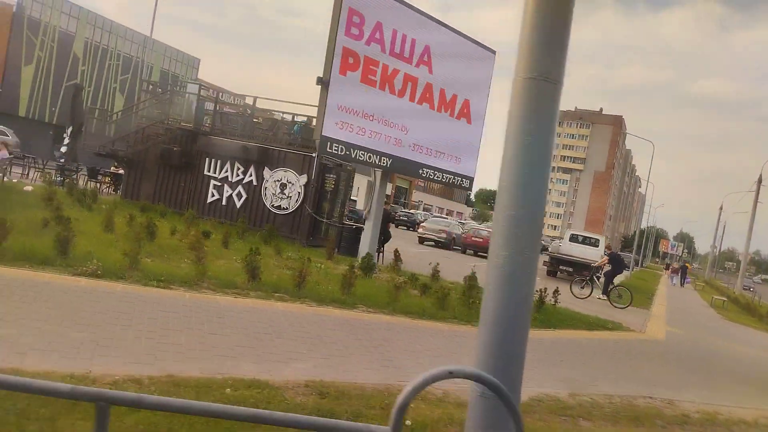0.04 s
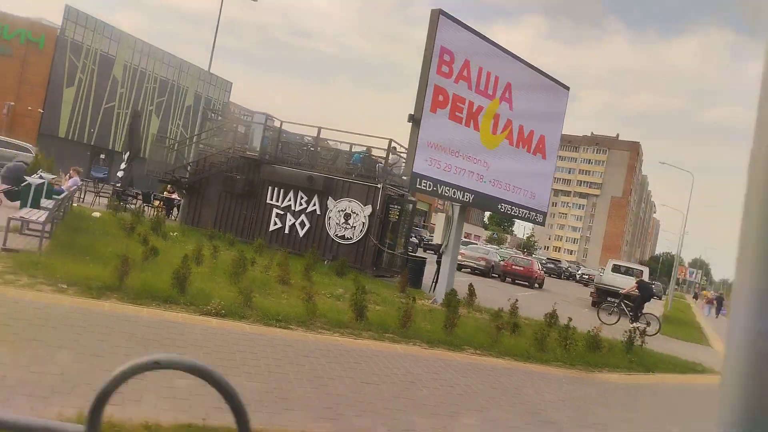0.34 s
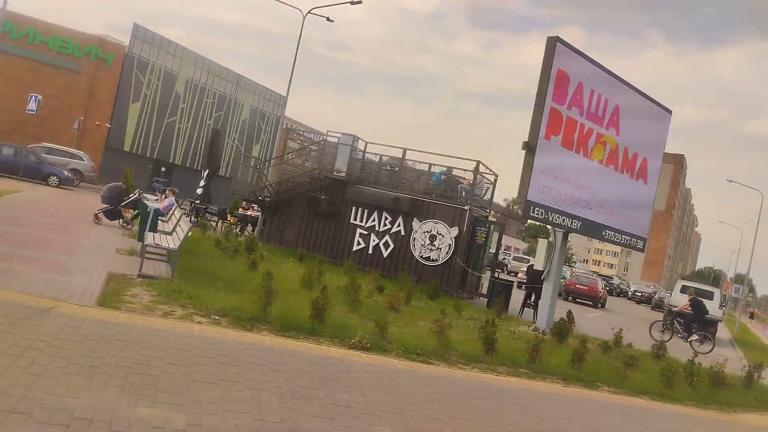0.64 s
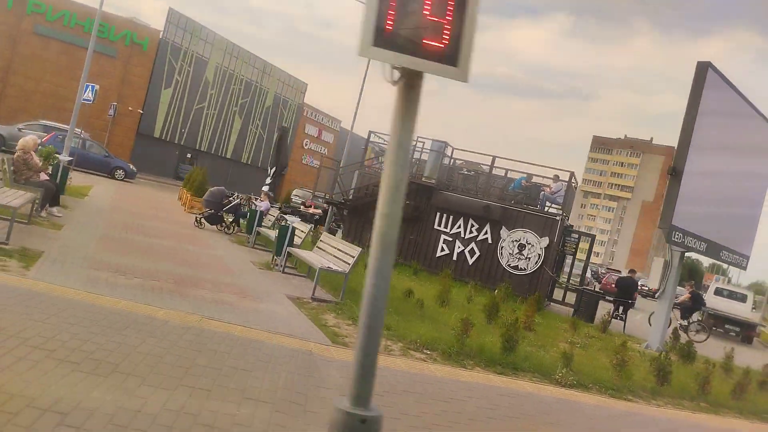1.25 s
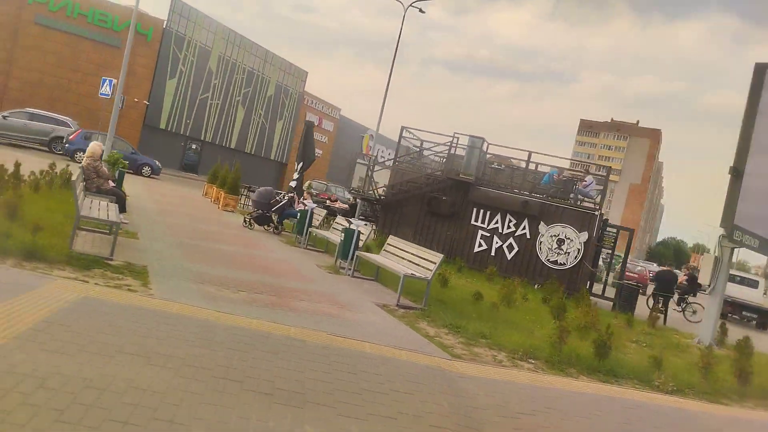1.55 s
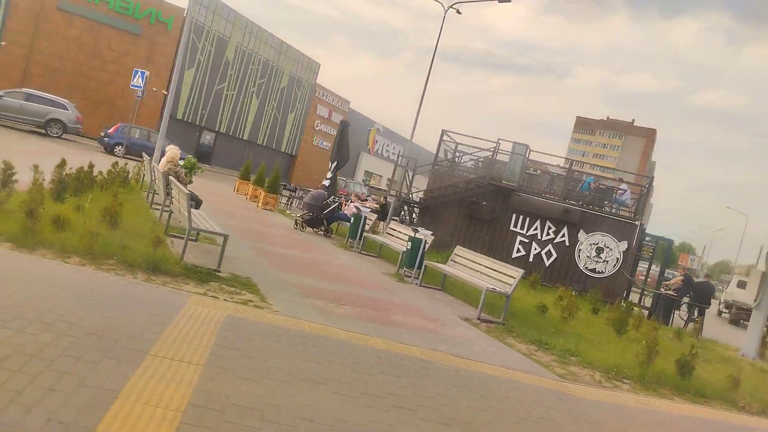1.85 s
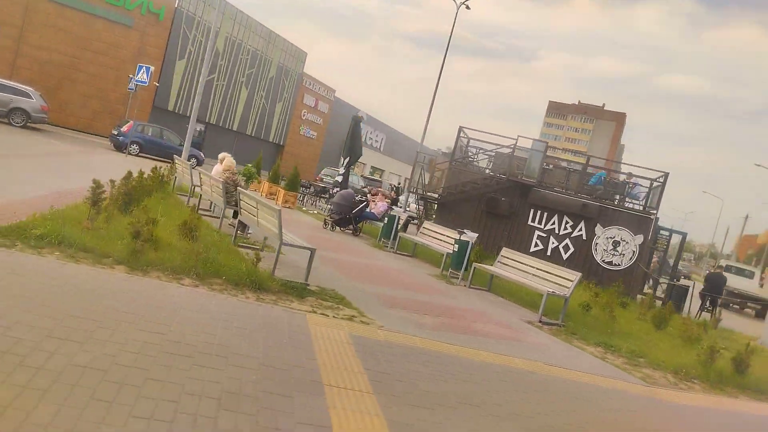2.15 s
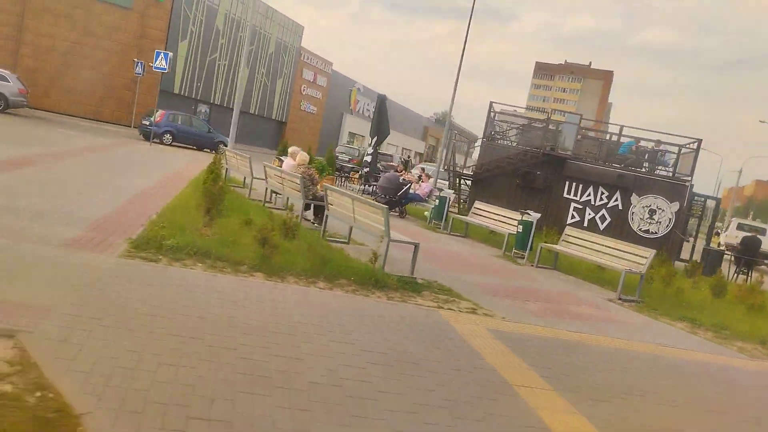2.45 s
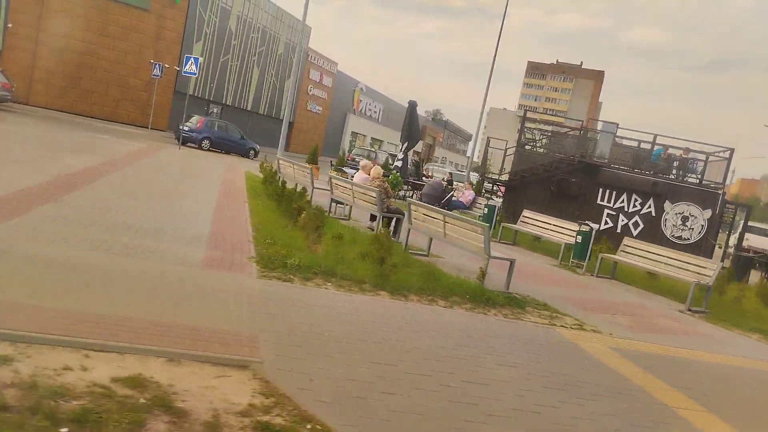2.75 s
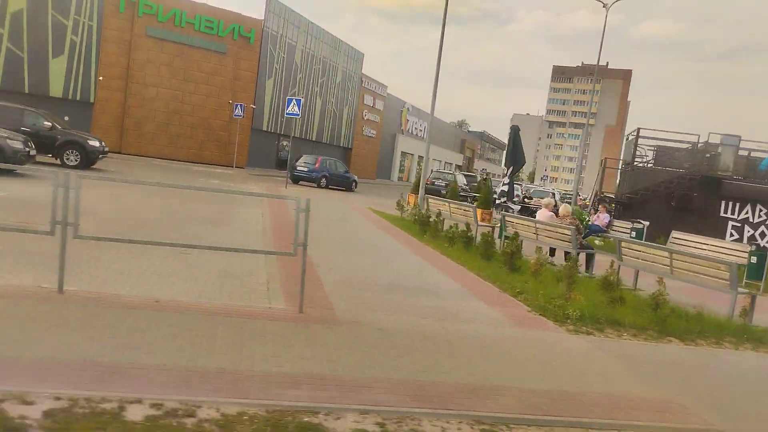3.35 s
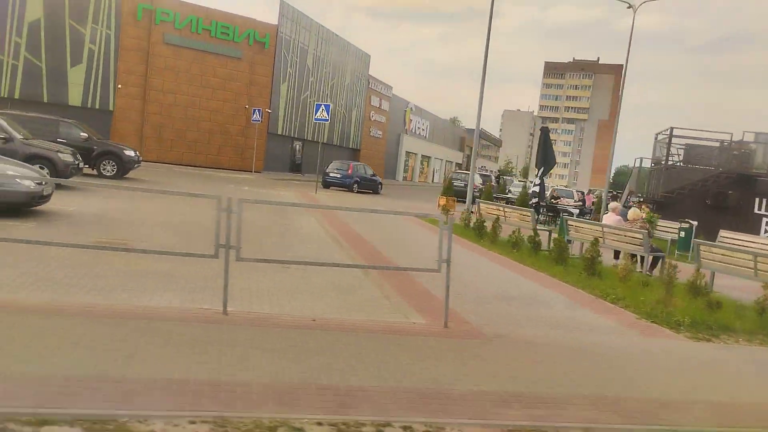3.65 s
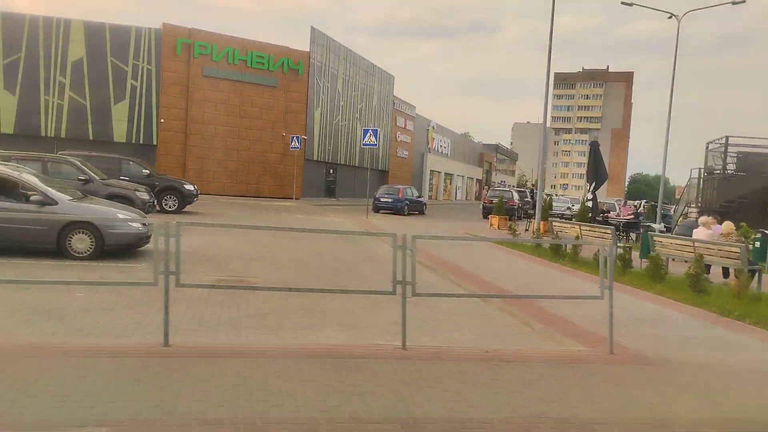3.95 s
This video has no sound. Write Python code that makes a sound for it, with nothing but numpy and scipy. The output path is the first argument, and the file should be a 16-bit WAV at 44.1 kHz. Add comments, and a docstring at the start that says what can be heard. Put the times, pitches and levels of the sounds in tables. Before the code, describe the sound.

A moving city bus rumbles and hums throughout, heard on a phone at a window seat, its engine note sinking as it eases off. From about 1 second a loose metal fitting chatters in thin bursts. Around 2.4 seconds a faint whistle starts to fall. From 3.2 seconds bumps bring low thuds, dull panel knocks and brief trim squeaks, until about 4 seconds.

```python
"""A moving city bus, heard on a phone microphone at a window seat. From the start tyres rumble underfoot,
the driveline's hum creeps up with road speed and the engine's firing note sinks as the throttle eases.
After a second a loose metal fitting chatters in bursts. From 2.4 s a faint turbo whistle runs down, and
the hum soon sags. From 3.2 s bumps heave the body on its springs, a panel knocks and the trim squeaks."""
import sys
import numpy as np
from scipy import signal
from scipy.fft import rfft, irfft
from scipy.io import wavfile
from scipy.ndimage import uniform_filter1d

SR = 44100
rng = np.random.default_rng(int(sys.argv[2]) if len(sys.argv) > 2 else 0)


def generate_wav(signal):
    """Clip the signal to [-1, 1] and save it as 16-bit WAV at the path in sys.argv[1]."""
    frames = np.transpose(np.atleast_2d(signal))
    scaled = np.clip(frames, -1, 1) * 32767
    pcm = np.round(scaled).astype(np.int16)
    wavfile.write(sys.argv[1], SR, pcm)


N = 176400

# the hum's fundamental (time [s], pitch [Hz])
DRIVELINE_PITCH = [(0, 146.9), (.5, 149.9), (1, 152.7), (1.5, 156.1), (2, 156.8), (2.6, 157.8),
                   (3.1, 156.2), (3.6, 153.9), (4, 152.5)]
# its first four harmonics at the seat, each (time [s], level [dB])
HARMONIC_1 = [(0, -11), (.7, -15.5), (.85, -16), (1.2, -14.5), (1.5, -17.5), (1.75, -11.5), (2.4, -14),
              (2.85, -21), (3.05, -32), (3.4, -21.5), (4, -40)]
HARMONIC_2 = [(0, -24), (.3, -45), (.47, -26.5), (.9, -18.5), (1.15, -26.5), (1.6, -23.5), (2.6, -26),
              (3.1, -27.5), (3.4, -37.5), (4, -39)]
HARMONIC_3 = [(0, -26.5), (.62, -23.5), (.8, -37.5), (2.1, -30), (2.4, -36.5), (2.65, -28.5), (3.05, -28),
              (3.3, -38), (4, -46)]
HARMONIC_4 = [(0, -31.5), (.6, -36.5), (.9, -29.5), (1.9, -39), (2.6, -33.5), (3, -40.5), (3.65, -36),
              (3.77, -27.5), (4, -26.5)]

def driveline(fifth_db=-51.5, flutter_db=1.17, overtone_flutter_db=2.5, wow=.003):
    """A hum tied to road speed fills the cabin; its harmonics waver and fade at the microphone."""
    pitch = curve(DRIVELINE_PITCH) * (1 + wow * walk(25.09))
    phase = 2 * np.pi * np.cumsum(pitch) / SR
    levels = [curve(HARMONIC_1), curve(HARMONIC_2), curve(HARMONIC_3), curve(HARMONIC_4), fifth_db]
    hum = 0
    for harmonic, db in enumerate(levels, start=1):
        flutter = (flutter_db if harmonic == 1 else overtone_flutter_db) * walk(27.96)
        hum += undb(db + flutter) * np.sin(harmonic * phase + 2 * np.pi * rng.random())
    return np.sqrt(2) * hum


# the engine easing off (time [s], firing rate [Hz], level [dB])
FIRING = [(0, 62, -13.5), (.5, 61.8, -16), (.8, 60.2, -17.5), (1.12, 58, -21.5), (1.4, 56.85, -19.5),
          (2.2, 56, -20), (2.6, 53.5, -22.5), (2.9, 51.8, -22.5), (3.2, 44.86, -25.5), (3.5, 39, -34),
          (4, 31, -22)]
# its orders (multiple of the firing rate, relative level [dB])
ENGINE_ORDERS = [(.5, -33), (1, 0.5), (1.5, -20), (2, -3), (3, -14.5), (3.5, -7.5), (4, -11.5), (4.5, -14)]

def engine(rough_db=1, jitter=.0036):
    """Uneven firings reach the seat through the body, booming at low orders of the firing rate."""
    firing_hz = curve(FIRING) * (1 + jitter * walk(15))
    phase = 2 * np.pi * np.cumsum(firing_hz) / SR
    boom = 0
    for order, db in ENGINE_ORDERS:
        boom += undb(db - rough_db * walk(14)) * np.sin(order * phase + 2 * np.pi * rng.random())
    return np.sqrt(2) * boom * undb(curve(FIRING, axis=2))


# road noise inside the bus (frequency [Hz], relative density [dB])
ROAD_SPECTRUM = [(8, -7.5), (18, 6.5), (30, 2), (70, -5.5), (120, -3.5), (170, -6.5), (220, -5),
                 (280, -12.5), (440, -13), (560, -17.5), (650, -19.5), (820, -22.5), (1150, -22.5),
                 (1450, -28), (1750, -30), (2500, -36), (3100, -44.5), (5000, -46.5), (8000, -51.5),
                 (10500, -60), (13000, -70), (16000, -72)]
# its changing balance (time [s], bass gain [dB], middle gain [dB], treble gain [dB])
ROAD_BALANCE = [(0, 0, 3, 2.5), (.8, 1.5, 1, -0.5), (1.3, 2.5, 0.5, -2), (2.2, 1, 1, -1.5),
                (2.9, 0, -1.5, -1.5), (3.3, 1, -2, -4.5), (3.6, 1, -3.5, -4.5), (4, -4, -5.5, -6.5)]
# trim resonances (centre [Hz], half-width [Hz], level before the treble gain [dB])
TRIM_RESONANCES = [(973, 41, -47.5), (1252, 23, -53), (1660, 99, -43.5), (4880, 130, -72)]

def road(gain_db=-16.5, swell_db=.42, flicker_db=.77):
    """Tyres rumble through the floor below the microphone, and the shaken trim rings."""
    hz = np.arange(N // 2 + 1) * SR / N
    octave = np.log2((hz + 1) / 16)  # counted up from 16 Hz
    tyres = noise(ROAD_SPECTRUM)
    bass, middle, treble = (curve(ROAD_BALANCE, axis) for axis in (1, 2, 3))
    swell = swell_db * walk(6.3)
    direct, echoed = rfft(tyres), rfft(cabin(tyres))
    bands = [(0, direct)] * 2 + [(bass, direct)] * 4 + [(middle, echoed)] * 2 + [(treble, echoed)] * 3
    rumble = trim = 0
    for k, (db, spectrum) in enumerate(bands):  # octaves swell together and flicker alone
        band = irfft(spectrum * np.maximum(1 - abs(octave - k), 0), N)
        rumble += band * undb(db + swell + flicker_db * walk(24.72))
    for centre, width, db in TRIM_RESONANCES:
        ringing = irfft(rfft(rng.standard_normal(N)) / (1 + ((hz - centre) / width) ** 2), N)
        trim += undb(db) * ringing / ringing.std()
    return undb(gain_db) * rumble + trim * undb(treble)


# the loose fitting's strikes (time [s], relative level [dB])
FITTING_STRIKES = [(1.078, -10), (1.325, -11), (1.412, -6), (1.427, -1.5), (1.462, -2.5), (1.479, -5),
                   (1.493, -3), (1.564, -9), (1.581, -4.5), (1.618, -7), (1.632, -7), (1.65, -2),
                   (1.659, -13), (1.688, -8), (1.706, -4), (1.721, -1), (1.742, -7), (1.777, -6),
                   (1.872, -8.5), (2.116, -14), (2.135, -4.5), (2.153, -8), (2.207, -8.5), (2.243, -8),
                   (2.262, -9), (2.278, -0.5), (2.294, -11), (2.349, -6.5), (2.478, -14), (2.754, -7.5),
                   (2.772, -20), (2.867, -6), (2.947, -9), (3.009, -14), (3.15, -6), (3.167, -1),
                   (3.193, -2), (3.212, -10), (3.51, -13), (3.585, -16)]
# its modes (frequency [Hz], relative level [dB], t60 [s])
FITTING_MODES = [(4800, -2, .12), (5308, -1, 0.11), (5350, -13, 0.12), (6330, 0, 0.14), (6150, -3, .13),
                 (7600, -9, .1), (8000, -9, 0.1), (9900, -5, .12), (9600, -5, .1), (11750, -9, .08)]
# the crack of a strike (frequency [Hz], relative density [dB])
CRACK_SPECTRUM = [(1500, -21), (3000, -4), (4700, -1), (8500, -2.5), (11500, -8.5), (13000, -20),
                  (16000, -11)]

def fitting(crack_db=-36, ring_db=-49, rise_s=.0019, crack_t60_s=.028, graze_lead_s=.0044):
    """Loose metal chatters in the cabin: each strike grazes, cracks, rings thinly and leaves a tail."""
    power = 0
    for start, db in FITTING_STRIKES:
        graze = undb(-4.5) * blow(start - graze_lead_s, rise_s, crack_t60_s)
        strike = blow(start, rise_s, crack_t60_s)
        cabin_tail = undb(-6.5) * blow(start, rise_s, t60=.18)
        power += undb(db) ** 2 * (graze ** 2 + strike ** 2 + cabin_tail ** 2)
    grain = undb(-.5 * walk(1500))
    cracks = np.sqrt(power) * grain * noise(CRACK_SPECTRUM)
    return undb(crack_db) * cracks + undb(ring_db) * ring(FITTING_STRIKES, FITTING_MODES, rise_s)


# the body's heaves (time [s], frequency [Hz], level [dB])
BODY_HEAVES = [(3.207, 35.2, -8.5), (3.47, 37.7, -7.5), (3.645, 34, -15), (3.858, 41.56, -12)]
# knocks on a panel (time [s], relative level [dB])
PANEL_KNOCKS = [(3.289, -8.5), (3.464, -7.5), (3.491, -5), (3.504, -1), (3.522, -7), (3.572, -11)]
# the panel's modes (frequency [Hz], relative level [dB], t60 [s])
PANEL_MODES = [(190, -13, 0.095), (324, -3.5, 0.18), (437.4, 4, 0.09), (520, -24, 0.064), (590, -7, 0.19),
               (659, -1.5, 0.086), (700, -6, 0.055), (750, -6, 0.047), (944, -7, 0.034), (1515, -22, 0.072)]

def bumps(knock_db=-8):
    """Under the seat the body heaves on its springs, and a panel knocks dully."""
    t = np.arange(N) / SR
    heave = 0
    for start, hz, db in BODY_HEAVES:
        heave += undb(db) * blow(start, rise=.008, t60=.34) * np.sin(2 * np.pi * hz * (t - start))
    return heave + undb(knock_db) * ring(PANEL_KNOCKS, PANEL_MODES, rise=.0047)


# rubbing trim (time [s], length [s], pitch [Hz], level [dB])
TRIM_SQUEAKS = [(.3, .08, 10650, -59), (1.978, .04, 4850, -53), (3.372, .025, 3700, -50),
                (3.426, .025, 3830, -53), (3.593, 0.023, 3780, -70), (3.64, .09, 3860, -63),
                (3.835, 0.034, 1060, -33)]

def squeaks():
    """Trim around the seat rubs in brief squeaks as the body flexes."""
    t = np.arange(N) / SR
    out = 0
    for start, length, hz, db in TRIM_SQUEAKS:
        arch = np.sin(np.pi * np.clip((t - start) / length, 0, 1))
        out += undb(db) * arch * whistle(hz, wobble=.0121)
    return out


# the turbo running down (time [s], pitch [Hz], level [dB])
TURBO_GLIDE = [(2.4, 4200, -74), (2.65, 3930, -73), (2.9, 3690, -60), (3.08, 3430, -57), (3.3, 3150, -72)]

def turbo():
    """Far in the background a faint whistle falls with the engine speed."""
    t = np.arange(N) / SR
    sounding = (t > TURBO_GLIDE[0][0]) & (t < TURBO_GLIDE[-1][0])
    return whistle(curve(TURBO_GLIDE), wobble=.0045) * undb(curve(TURBO_GLIDE, axis=2)) * sounding


def cabin(x, echo_gain=.34, t60=.11):
    """Dense early echoes from nearby windows and seats make the spectrum ragged."""
    t = np.arange(SR // 6) / SR
    tail = rng.standard_normal(len(t)) * undb(-60 * t / t60)
    echo = signal.fftconvolve(x, tail / np.linalg.norm(tail))[:N]
    return (x + echo_gain * echo) / np.hypot(1, echo_gain)


def ring(hits, modes, rise, size=16000):
    """An object's decaying modes, struck afresh by each hit."""
    out, t = np.zeros(N + size), np.arange(size) / SR
    for start, hit_db in hits:
        tone = 0
        for hz, db, t60 in modes:
            tone += undb(db - 60 * t / t60) * np.sin(2 * np.pi * (hz * t + rng.random()))
        i = int(start * SR)
        out[i:i + size] += undb(hit_db) * np.minimum(t / rise, 1) * tone
    return out[:N]


def blow(start, rise, t60):
    """Envelope of a blow: a short rise, then an exponential fall; times in seconds."""
    age = np.maximum(np.arange(N) / SR - start, 0)
    return np.minimum(age / rise, 1) * undb(-60 * np.maximum(age - rise, 0) / t60)


def whistle(hz, wobble):
    """A thin unsteady tone of rms 1."""
    pitch = hz * (1 + wobble * walk(200))
    return np.sqrt(2) * np.sin(2 * np.pi * np.cumsum(pitch) / SR)


def noise(points):
    """Noise of rms 1, shaped by (frequency [Hz], level [dB]) points."""
    rows, hz = np.array(points, float), np.arange(N // 2 + 1) * SR / N
    shape_db = np.interp(np.log(hz + 1), np.log(rows[:, 0]), rows[:, 1])
    y = irfft(rfft(rng.standard_normal(N)) * undb(shape_db), N)
    return y / y.std()


def walk(rate):
    """Random levels held 1 / rate s and smoothed twice; spread 1."""
    hold = int(SR / rate)
    steps = np.repeat(rng.standard_normal(N // hold + 1), hold)
    y = uniform_filter1d(uniform_filter1d(steps, hold), hold)[:N]
    return y / y.std()


def curve(table, axis=1):
    """One column of a time table, joined by straight lines."""
    rows = np.array(table, float)
    return np.interp(np.arange(N) / SR, rows[:, 0], rows[:, axis])


def undb(db):
    """Decibels to gain."""
    return 10 ** (np.asarray(db) / 20)


def scene():
    """Everything that reaches the window seat, in mono."""
    return (driveline() + engine() + turbo() + road() + fitting() + squeaks() + bumps())[None]


def record(dry, top_hz=15800):
    """The phone's microphone rounds only the highest peaks and cuts the top."""
    rounded = dry / (1 + dry ** 8) ** (1 / 8)
    return signal.sosfilt(signal.ellip(10, .2, 80, top_hz, fs=SR, output="sos"), rounded)


dry = scene()
out = record(dry)
generate_wav(out)
```